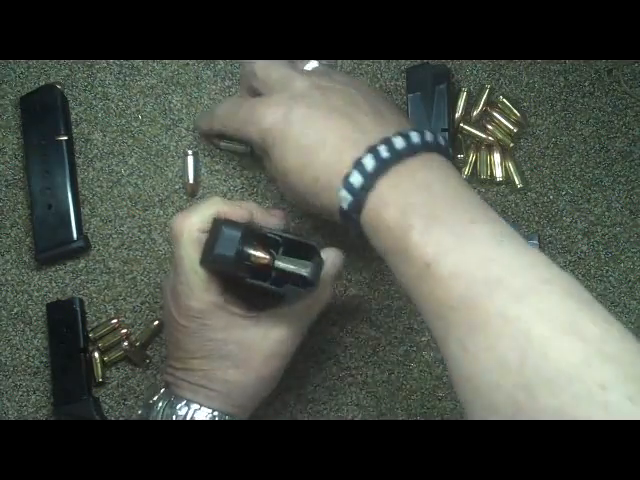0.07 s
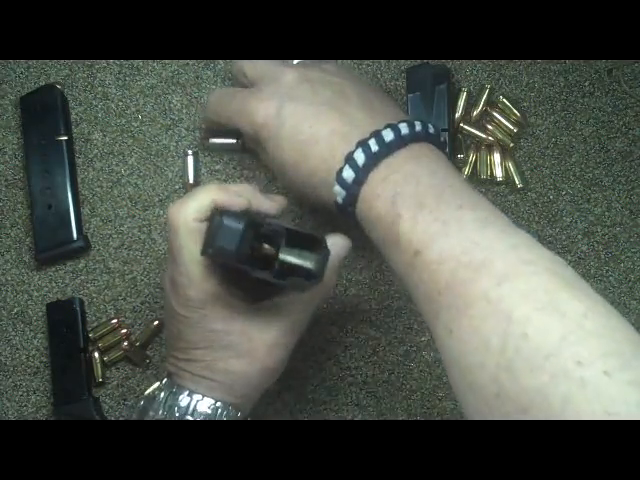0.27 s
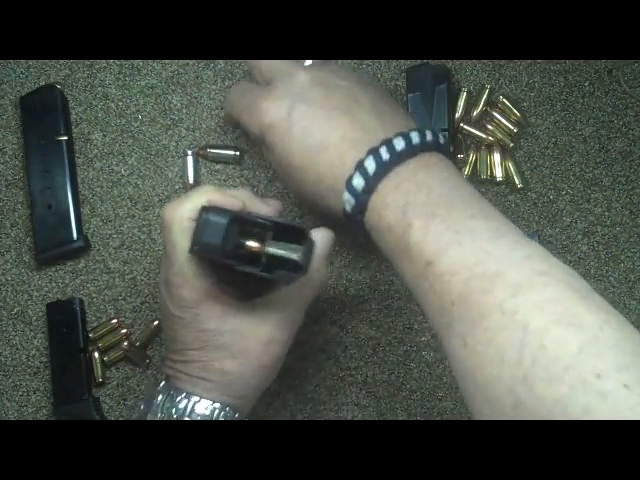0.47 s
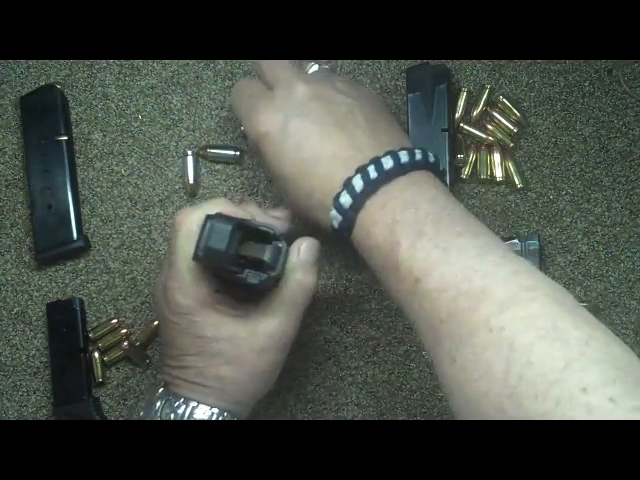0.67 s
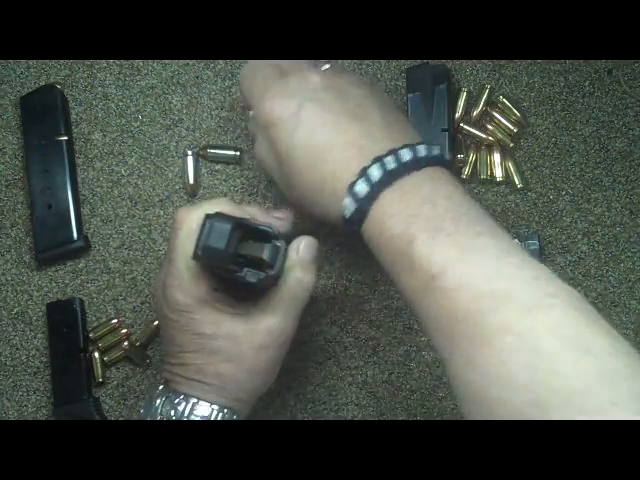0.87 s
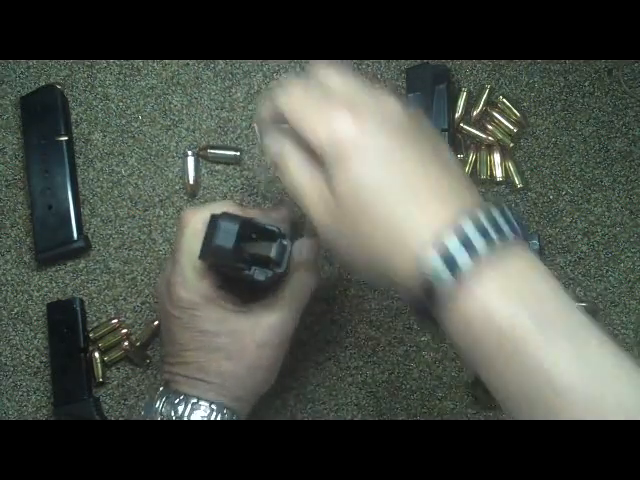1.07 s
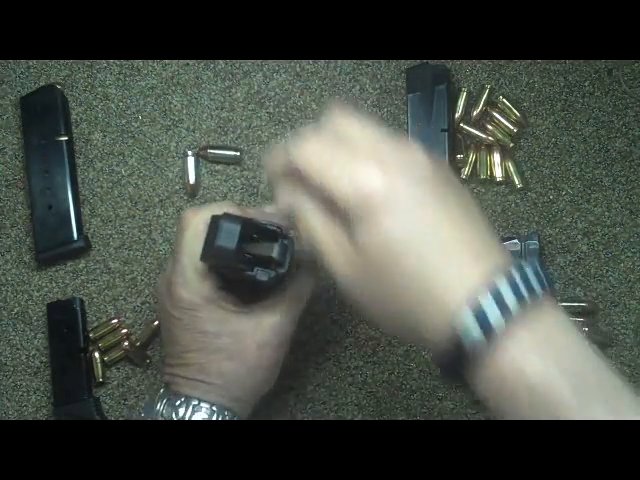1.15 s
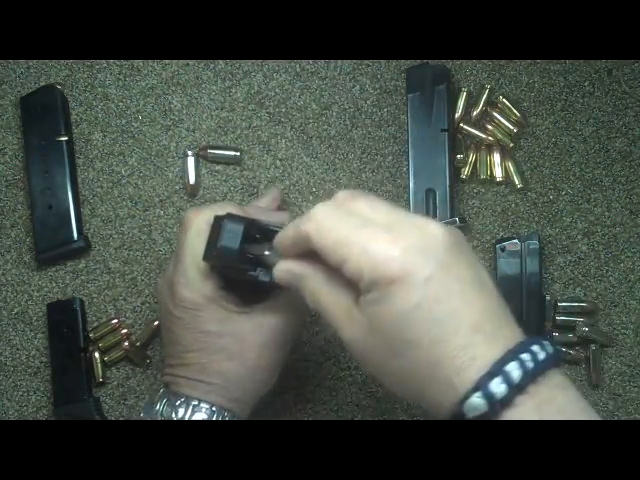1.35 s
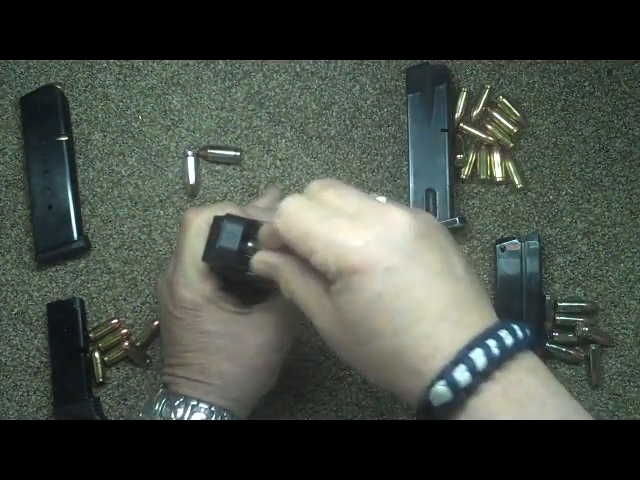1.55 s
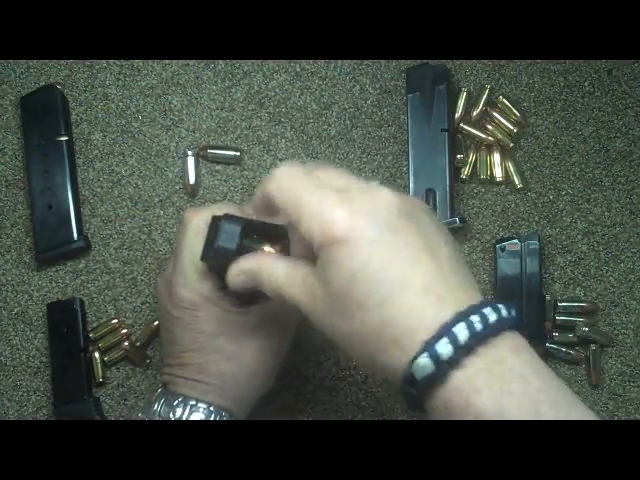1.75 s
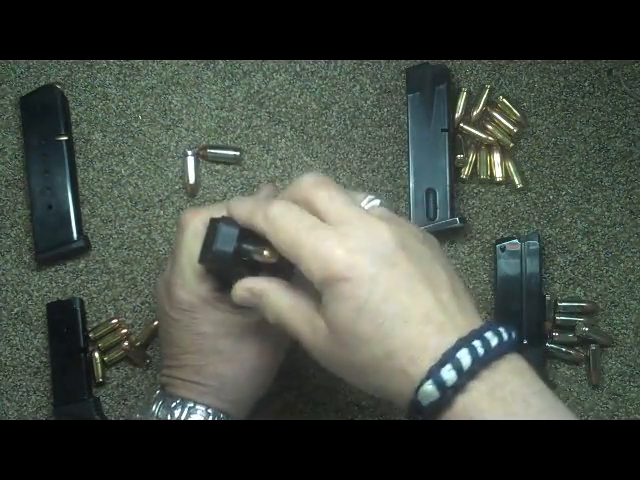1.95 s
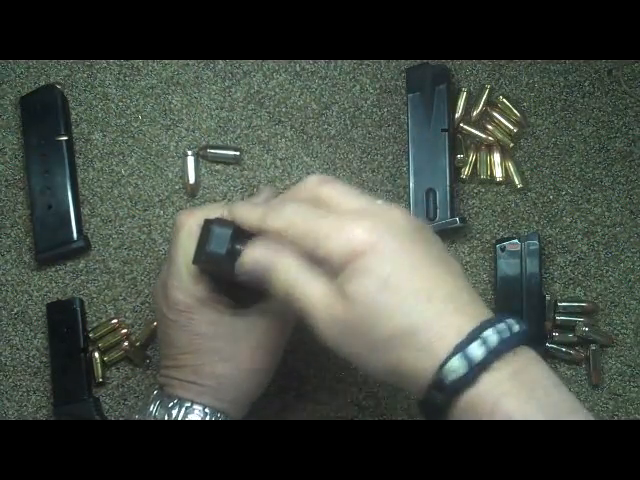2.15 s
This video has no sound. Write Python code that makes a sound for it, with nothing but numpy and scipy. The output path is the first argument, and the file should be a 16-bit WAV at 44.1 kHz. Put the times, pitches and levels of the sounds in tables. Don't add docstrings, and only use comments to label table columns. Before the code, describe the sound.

Pistol magazine being loaded: sharp metal and plastic clicks, sliding scrapes, close in a quiet room

```python
import sys
import numpy as np
from scipy import signal
from scipy.fft import rfft, irfft
from scipy.io import wavfile
from scipy.ndimage import uniform_filter1d

SR = 44100
rng = np.random.default_rng(int(sys.argv[2]) if len(sys.argv) > 2 else 0)


def inscribe(sig):
    pcm = np.round(np.clip(np.atleast_2d(sig).T, -1, 1) * 32767)
    wavfile.write(sys.argv[1], SR, pcm.astype(np.int16))


def nominal_scale(level):
    x = np.asarray(level, float) / 20
    return 10 ** x


N = 97020


def evened(x):
    return x / np.sqrt(np.mean(x ** 2) + 1e-20)


def read(points, hz):
    f, value = np.transpose(points)
    return np.interp(np.log(hz + 1), np.log(f + 1), value)


def add(mix, s, sound):
    part = mix[round(s * SR):][:len(sound)]
    part += sound[:len(part)]


def ring(hz, width, phase):
    t = np.arange(4096) / SR
    decay = np.exp(-np.pi * width * t)
    return np.sqrt(4 * np.pi * width / SR) * decay * np.sin(2 * np.pi * hz * t + phase)


DETUNE, GRIP_DB = 0.027, 3


def response(modes, voice, own_hz=None):
    own_db, own_width, crack_db, lo_hz, hi_hz, widening, *_ = voice
    band = signal.butter(2, [lo_hz, hi_hz], "band", fs=SR, output="sos")
    crack = signal.sosfilt(band, np.arange(4096) == 0)
    out = np.zeros(4096)
    for hz, width, db in modes:
        louder, flip, shift = rng.random(3) - 0.5
        mode_width = max(width * widening, 25)
        out += nominal_scale(db + GRIP_DB * louder) * ring(hz * (1 + DETUNE * shift), mode_width, np.pi * (flip > 0))
    out = out / np.linalg.norm(out) + nominal_scale(crack_db) * crack / np.linalg.norm(crack)
    if own_hz:
        out = out + nominal_scale(own_db) * ring(own_hz, max(own_width, 40), 0)
    out = signal.sosfilt(band, out)
    return out / np.linalg.norm(out)


def ticks(count, per_s, spread_db):
    chance, size, sign = rng.random((count, 3)).T
    struck = np.clip((per_s / SR - chance) * SR, 0, 1)
    return struck * nominal_scale(-spread_db * np.log(size * 0.98 + 0.02)) * np.sign(sign - 0.5)


SLIPS_PER_S, SLIP_SPREAD_DB, PATCHY_DB = 9000, 0, 2.4


def slips():
    uneven = nominal_scale(PATCHY_DB * evened(uniform_filter1d(rng.standard_normal(N), size=500)))
    return evened(uneven * ticks(count=N, per_s=SLIPS_PER_S, spread_db=SLIP_SPREAD_DB))


# frequency in Hz, width in Hz, level in dB.
BODY_MODES = [(1607, 140, -3), (1886, 45, -7.5), (2060, 38, -1.5), (2270, 170, -14), (2500, 26, -8.5),
              (2854, 220, -8.5), (2976, 80, -6), (3140, 190, -2.5), (3456, 41, -6)]
METAL_MODES = [(5090, 220, 15.5), (6260, 280, 13), (6700, 100, 14), (7320, 50, 2), (8300, 220, -6),
               (9550, 87, -21), (10800, 480, -14.5)]
# own ring level in dB, own ring width in Hz, crack level in dB,
# crack low edge in Hz, crack high edge in Hz, mode widening as a factor.
BODY_RUB = (0, 100, 2, 1512, 4509, 1.1)
METAL_RUB = (0, 100, 15, 3700, 10195, -5)
# time in seconds, pressure in dB, brightness in dB.
HANDS = [(0, -56.5, -4.5), (.07, -58, -9.5), (.14, -63, -7), (.36, -64, -5), (.52, -63, -6.5),
         (.74, -67.5, 1), (.8, -68, -6), (.94, -70, -4), (.99, -56.5, -10.5), (1.14, -52, -8),
         (1.26, -56, -3.5), (1.4, -63.5, -9), (1.6, -64, -1), (1.84, -68, -4.5), (2, -64, -10),
         (2.2, -72.5, -4)]
# start in seconds, length in seconds, level in dB,
# brightness in dB, rising share 0-1.
SLIDES = [(0.19, 0.15, -56.5, 2, 0.52), (0.265, 0.095, -61.5, -5.5, 0.4), (0.537, .05, -57, -24, 0.3),
          (0.599, 0.13, -54.5, -3.5, 0.11), (0.696, 0.026, -78, -3, .1), (0.999, 0.076, -42.5, -5.5, 0.31),
          (1.079, 0.043, -56.5, -1, 0.03), (1.183, 0.067, -57, -18, .25), (1.437, 0.12, -56, -1.5, 0.44),
          (1.497, 0.076, -63, 1, .2), (1.602, 0.044, -48.5, -4.5, .6), (1.665, 0.042, -47, 0.5, 0.66),
          (1.684, 0.04, -62, -1, 0), (1.74, .1, -69, 5.5, .1), (1.881, 0.078, -61.5, -7, 0.17),
          (2.137, 0.1, -71, 5, .4)]
SLIDE_FALL = 0.31


def rubbing_and_sliding():
    t = np.arange(N) / SR
    at, db, bright_db = np.transpose(HANDS)
    on_body = nominal_scale(np.interp(t, at, db))
    on_metal = on_body * nominal_scale(np.interp(t, at, bright_db))
    for s, length, db, bright_db, rising in SLIDES:
        u = (t - s) / length
        swell = np.minimum(u / max(rising, 0.02), (1 - u) / SLIDE_FALL)
        stroke = nominal_scale(db) * np.clip(swell, 0, 1)
        on_body = on_body + stroke
        on_metal = on_metal + stroke * nominal_scale(bright_db)
    body = signal.oaconvolve(slips() * on_body, response(BODY_MODES, BODY_RUB))[:N]
    metal = signal.oaconvolve(slips() * on_metal, response(METAL_MODES, METAL_RUB))[:N]
    return body + metal


# frequency in Hz, width in Hz, level in dB.
TABLE_MODES = [(188, 51, 0.5), (306, 65, -8.5), (451, 47, -6.5), (507.4, 28, -2.5), (628, 180, -2.5),
               (703, 130, -3)]
TABLE_RUB = (0, 100, -7.5, 374, 747, 1.85)
# time in seconds, level in dB.
DRAG = [
    (.98, -74.5),
    (1.01, -55),
    (1.1, -54.5),
    (1.2, -61.5),
    (1.26, -66),
    (1.42, -79),
]


def foot_drag():
    pressure = nominal_scale(np.interp(np.arange(N) / SR, *np.transpose(DRAG), right=-120))
    return signal.oaconvolve(slips() * pressure, response(TABLE_MODES, TABLE_RUB))[:N]


# frequency in Hz, level in dB per Hz.
AIR = [(20, 6.5), (60, 3), (200, -2), (700, -4.5), (1200, -0.5), (2000, -12), (3200, -14), (5000, -25.5),
       (13900, -21)]
AIR_DB = -69


def air():
    hz = np.fft.rfftfreq(N, 1 / SR)
    colored = irfft(rfft(rng.standard_normal(N)) * nominal_scale(read(AIR, hz)), N)
    return nominal_scale(AIR_DB) * evened(colored)


TICKS_PER_S, TICK_SPREAD_DB = 3500, 4
GRIT = 0.74


def hits(rows, modes, voice):
    out, t = np.zeros(N), np.arange(3000) / SR
    for s, db, hz, chatter_ms in rows:
        chatter = (chatter_ms + 0.3) / 1000
        rise = chatter * abs(voice[6]) + 1e-4
        force = np.minimum(t / rise, 1) * np.exp(-(t / chatter) ** 1.5)
        burst = ticks(count=len(t), per_s=TICKS_PER_S, spread_db=TICK_SPREAD_DB)
        drive = force * (burst + GRIT * rng.standard_normal(len(t)))
        sound = signal.fftconvolve(drive, response(modes, voice, hz))
        peak = np.sqrt(uniform_filter1d(sound ** 2, size=176).max())
        add(out, s - rise / 2, nominal_scale(db) * sound / peak)
    return out


# start in seconds, peak level in dB, loudest ring in Hz, chatter in ms.
SNAPS = [(0.0727, -56, 4610, 5), (0.2345, -37.5, 7730, 3.8), (.2395, -44, 6200, 6),
         (0.2636, -27.5, 7140, 2.8), (.269, -36.5, 5250, 3.1), (0.2744, -33, 6260, 1.4),
         (0.2928, -41, 6800, 5.2), (0.3108, -50, 6460, 2), (0.3184, -41, 6300, 1.6), (.322, -45.5, 6200, 6),
         (0.5362, -52.5, 4100, 3.4), (0.5581, -53, 4750, 4.8), (0.6114, -68, 6660, 5),
         (0.6893, -25, 8300, 1.78), (.6955, -46, 6930, 5), (1.0261, -39.5, 7460, 10.7),
         (1.037, -41, 7600, 5), (1.0594, -49, 4070, 7), (1.0944, -39.5, 7180, 7), (1.1864, -43, 6900, 6),
         (1.1937, -34, 7180, 5.3), (1.1945, -42, 4950, 6.3), (1.4262, -45, 5540, 7.9),
         (1.477, -31.5, 4600, 5), (1.5105, -35.5, 5390, 7.6), (1.5244, -27.5, 4920, 3.55),
         (1.525, -31, 6950, 3.4), (1.5314, -30, 5260, 2.3), (1.547, -34, 5170, 4), (1.554, -41, 4930, 6),
         (1.613, -52, 7000, 5.2), (1.6327, -43.5, 7040, 5), (1.6866, -31.5, 5200, 4.3),
         (1.6914, -39.5, 5600, 4.4), (1.7, -44, 5000, 7), (1.7255, -30, 4620, 6.3), (1.726, -57, 9600, 3),
         (1.7314, -34.5, 5100, 3.9), (1.7394, -38, 4400, 3), (1.897, -52, 6800, 13), (1.903, -50, 4560, 7),
         (1.967, -62.5, 6300, 7), (2.0667, -58, 9650, 18.5), (2.069, -64, 7400, 13)]
METAL_VOICE = (5, 150, 3.4, 3170, 9900, 1.5, 0.22)


def metal_snaps():
    return hits(SNAPS, METAL_MODES, METAL_VOICE)


# start in seconds, peak level in dB, loudest ring in Hz, chatter in ms.
KNOCKS = [(0.0728, -48.5, 2310, 2.7), (0.0784, -44.5, 2170, 5.7), (0.191, -45, 2220, 7.6),
          (0.2384, -41.5, 2450, 7.8), (.252, -40, 2080, 5.4), (0.2643, -28, 3220, 1.52),
          (.2695, -31, 1900, 4.04), (.2715, -29, 3520, 3.18), (.277, -32.5, 1980, 5.7),
          (0.2844, -48, 2030, 12.3), (.299, -38.5, 2000, 5.4), (0.3264, -49, 2730, 6.1),
          (0.3774, -56, 2870, 3.1), (0.5367, -42.5, 3250, 4.5), (.541, -43.5, 2370, 5.3),
          (.5585, -46.5, 3300, 3.7), (0.5631, -47, 3180, 3), (0.6135, -46.5, 2270, 4),
          (0.6915, -38, 3230, 2.2), (.6965, -53.5, 3350, 6.1), (0.8265, -51, 3060, 6.7),
          (1.0006, -44.5, 3220, 8.8), (1.0271, -38, 3250, 8), (1.039, -49.5, 2600, 4.5),
          (1.055, -42.5, 3980, 9), (1.0954, -38.5, 3630, 8.8), (1.113, -44, 2060, 12),
          (1.1972, -37.5, 3250, 5.8), (1.4262, -41, 3200, 8.4), (1.478, -25.5, 3180, 2.02),
          (1.4834, -26.5, 2265, 2.8), (1.4925, -52, 2100, 7.3), (1.5115, -30.5, 3140, 2.74),
          (1.5174, -34.5, 2900, 4.1), (1.5294, -36.5, 3000, 5.4), (1.548, -39.5, 3170, 3.7),
          (1.561, -47, 2100, 8), (1.6871, -35.5, 3050, 2.8), (1.692, -42.5, 2570, 5.8),
          (1.726, -29.5, 3160, 3.2), (1.7354, -34.5, 3230, 2.7), (1.7405, -38.5, 2080, 2.85),
          (1.9021, -47.5, 2060, 4.04)]
BODY_VOICE = (0.6, 200, -1.5, 1564, 4700, 1.5, 0.62)


def body_knocks():
    return hits(KNOCKS, BODY_MODES, BODY_VOICE)


# start in seconds, peak level in dB, loudest ring in Hz, chatter in ms.
THUMPS = [(.074, -59, 458, 6.6), (.278, -53.5, 560, 13.4), (.377, -61.5, 787, 16.5), (.536, -57, 860, 7.4),
          (.689, -57, 265, 8.1), (1.004, -54, 431, 9.1), (1.023, -47, 303, 9.8), (1.059, -45, 590, 13.6),
          (1.091, -41, 512, 13.8), (1.119, -59, 550, 13.4), (1.154, -51, 440, 9.1),
          (1.191, -44.5, 586, 10.3), (1.477, -48.5, 620, 5.9), (1.516, -50.5, 564, 21),
          (1.628, -63, 273, 10.5), (1.686, -49.5, 184, 6.24), (1.726, -48.5, 610, 8),
          (1.895, -60, 316, 7.8), (1.925, -65.5, 388, 29)]
TABLE_VOICE = (2.5, 58, -2, 193, 1026, 2.2, 0.62)


def table_thumps():
    return hits(THUMPS, TABLE_MODES, TABLE_VOICE)


# start in seconds, peak level in dB, loudest ring in Hz, chatter in ms.
JOLTS = [
    (.689, -63.5, 95, 3.1),
    (1.897, -75, 169, 13),
]
JOLT_VOICE = (24, 60, -19, 50, 304, -2, -0.1)


def table_jolts():
    return hits(JOLTS, TABLE_MODES, JOLT_VOICE)


# start in seconds, peak level in dB, loudest ring in Hz, chatter in ms.
TAPS = [(1.003, -54, 1044, 10), (1.108, -46.5, 1076, 12), (1.2144, -44.5, 1684, 8),
        (1.2366, -46.5, 1580, 7.5), (1.428, -48.5, 1097, 7), (1.479, -40.5, 1078, 5.98),
        (1.514, -45, 1070, 8.4), (1.688, -44.5, 1132, 4.56), (1.6115, -45, 2060, 5),
        (1.624, -43.5, 2060, 9.4), (1.672, -48.5, 1900, 10), (1.921, -45, 1630, 7.8),
        (1.9679, -57, 1690, 2.8), (2.0375, -49.5, 1570, 3.1)]
TAP_VOICE = (19, 75, -6, 850, 3500, 2.2, .7)


def wall_taps():
    return hits(TAPS, BODY_MODES, TAP_VOICE)


# frequency in Hz, time to fall 60 dB in seconds.
ROOM = [(200, 0.16), (1000, 0.084), (4000, 0.069), (10000, 0.051)]
ROOM_DB = -10.5


def room(x):
    late = np.arange(SR // 2) > 200
    hz, t, z = signal.stft(rng.standard_normal(SR // 2) * late, SR, nperseg=256)
    fade = nominal_scale(-60 * t / read(ROOM, hz)[:, None])
    tail = signal.istft(z * fade, SR, nperseg=256)[1]
    return nominal_scale(ROOM_DB) * signal.fftconvolve(x, tail / np.linalg.norm(tail))[:N]


MIC_LOW_HZ, MIC_HIGH_HZ = 45.5, 14400


def scene():
    near = rubbing_and_sliding() + foot_drag()
    near = near + metal_snaps() + body_knocks() + table_thumps() + table_jolts() + wall_taps()
    band = signal.butter(4, [MIC_LOW_HZ, MIC_HIGH_HZ], "band", fs=SR, output="sos")
    return (signal.sosfilt(band, near + room(near)) + air())[None]


def roll_off(x):
    return signal.sosfilt(signal.butter(12, 14020, fs=SR, output="sos"), x)


def record(dry):
    mix = dry - 0.0005
    return roll_off(mix)


dry = scene()
out = record(dry)
inscribe(out)
```